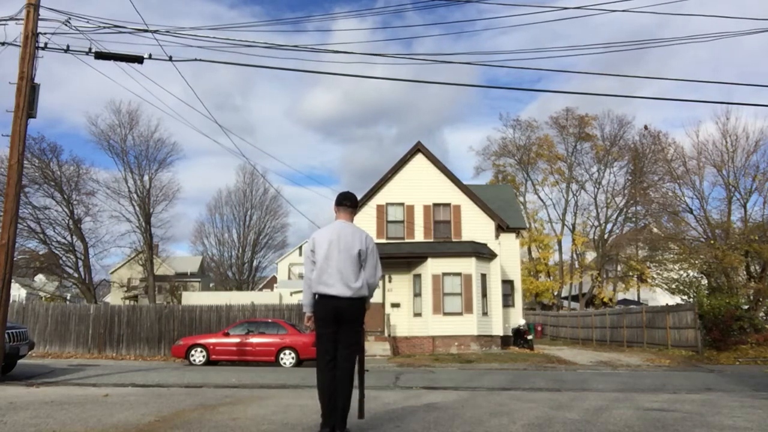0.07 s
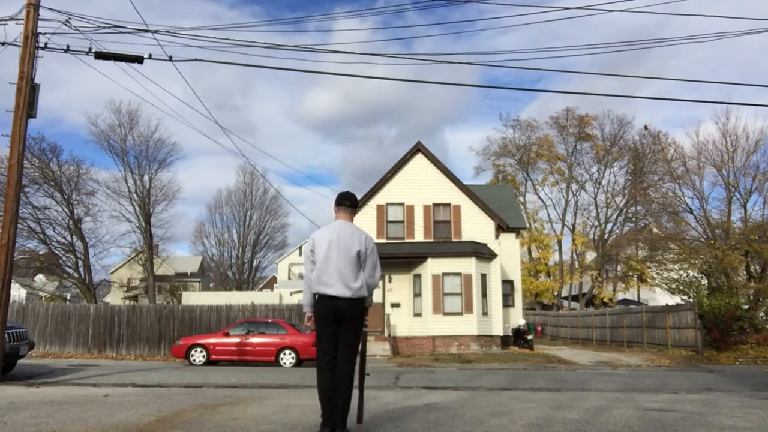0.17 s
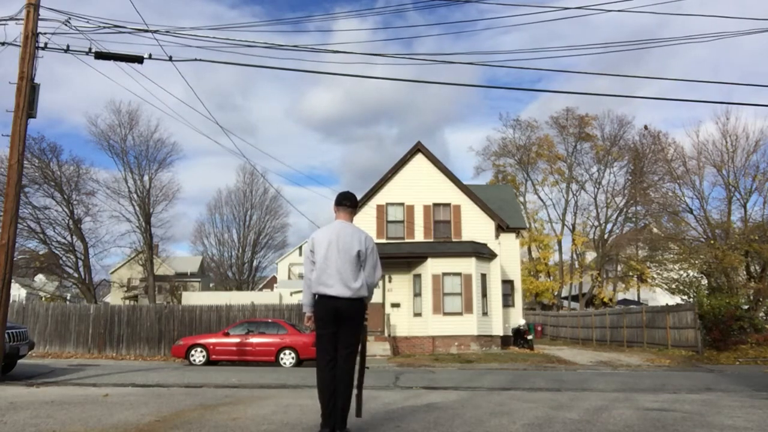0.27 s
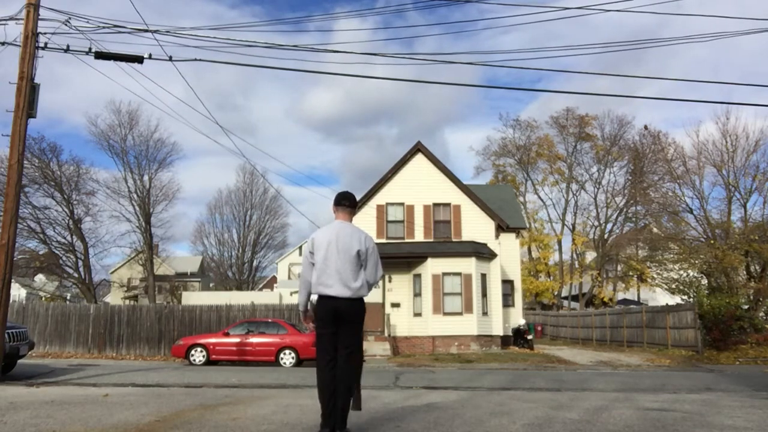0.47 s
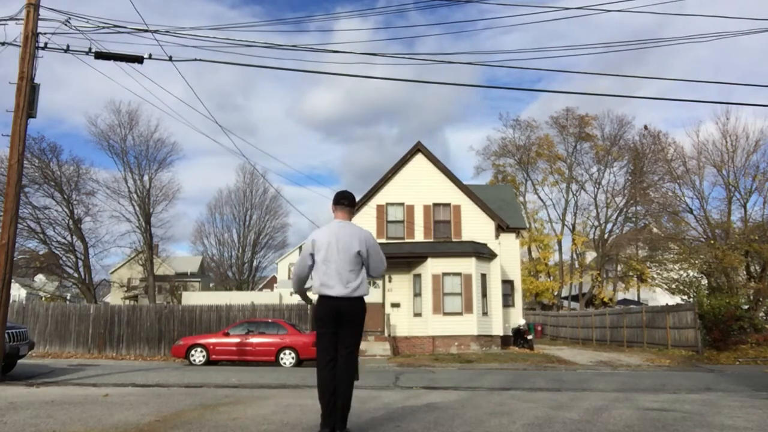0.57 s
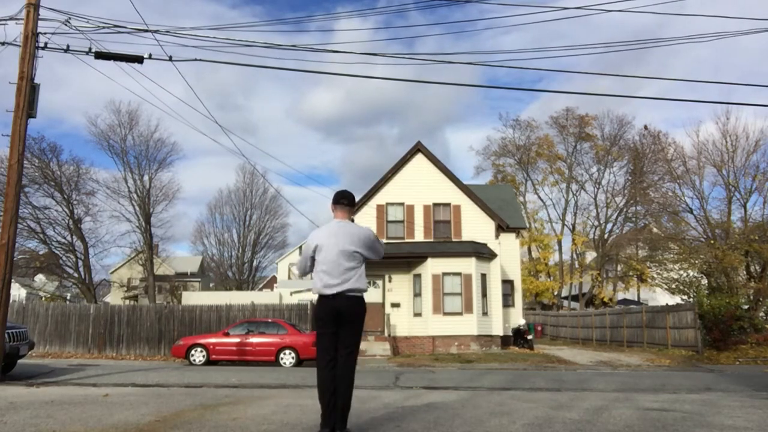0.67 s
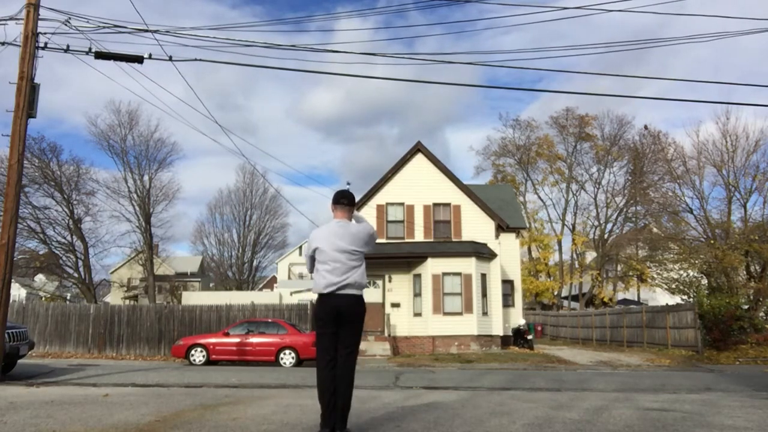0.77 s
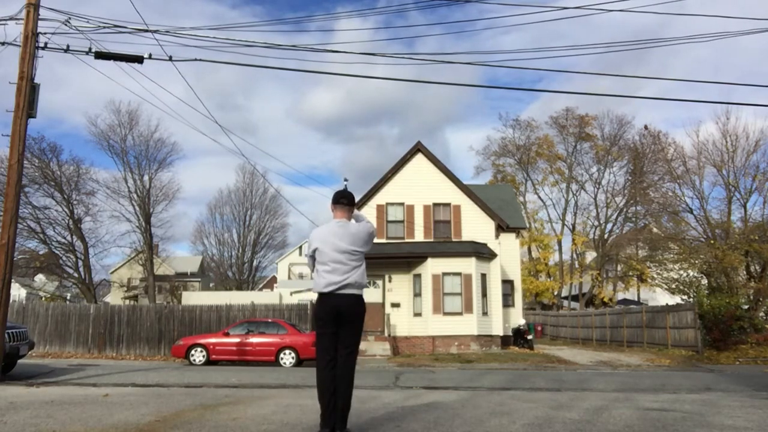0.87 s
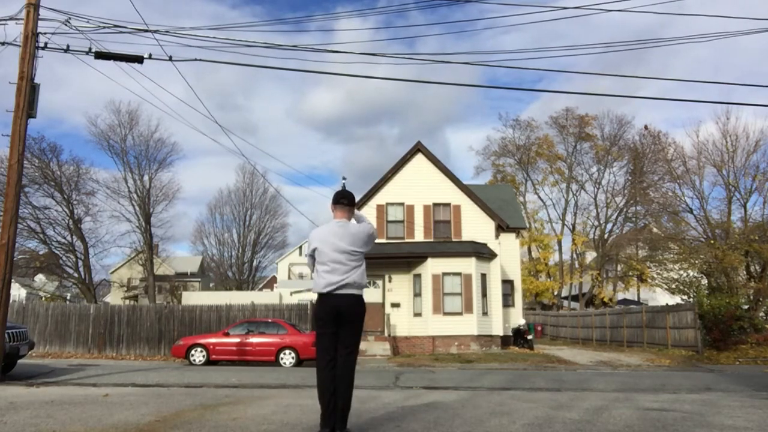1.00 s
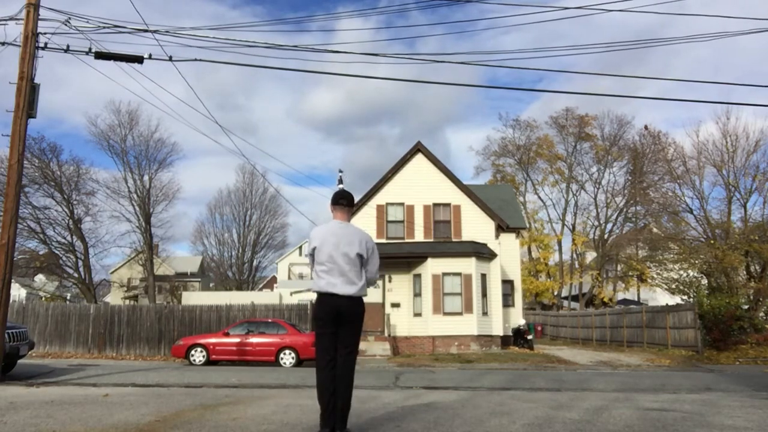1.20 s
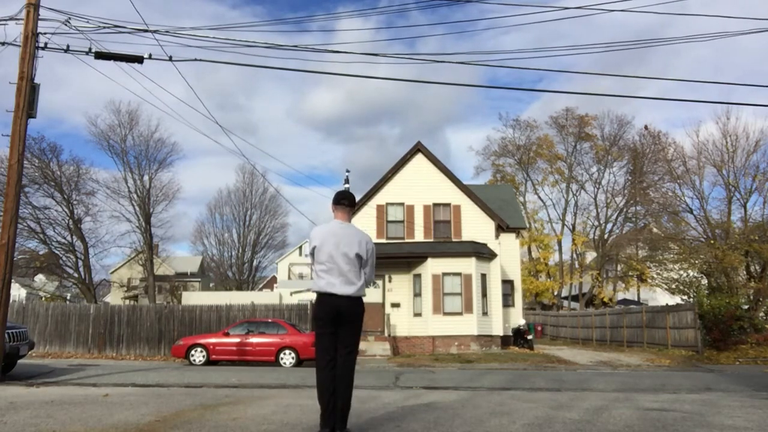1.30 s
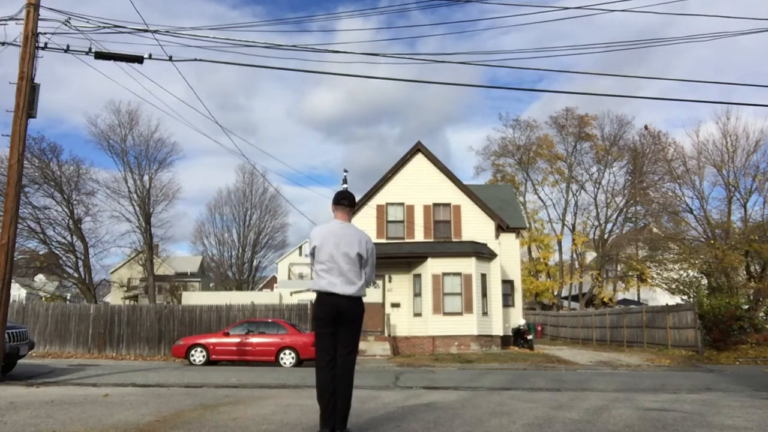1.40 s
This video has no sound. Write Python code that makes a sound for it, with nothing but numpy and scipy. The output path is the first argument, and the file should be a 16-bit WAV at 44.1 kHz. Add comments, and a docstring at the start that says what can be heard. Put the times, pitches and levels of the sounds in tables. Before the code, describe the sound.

A drill rifle cracks against asphalt, then clatters into hands twice, with wind rumbling.

```python
"""A few faint ticks from a drill rifle's sling and fittings, then its butt hits asphalt with a sharp crack.
The blow rings the wooden stock and rattles the loose steel; house fronts across the street echo it.
One steel part sings on as the rifle swings up, until a hand catches it with a smaller clatter.
A second catch seats the rifle at the shoulder.
All the while, wind buffets the microphone over a quiet outdoor background."""
import sys
import numpy as np
from scipy import signal
from scipy.fft import rfft, irfft
from scipy.io import wavfile
from scipy.ndimage import uniform_filter1d

SR = 44100
rng = np.random.default_rng(int(sys.argv[2]) if len(sys.argv) > 2 else 0)


def transcribe(signal):
    """Save signal, clipped to [-1, 1], as a 16-bit WAV file at the path in sys.argv[1]."""
    frames = np.atleast_2d(signal).T
    limited = np.clip(frames, -1, 1)
    pcm = np.round(limited * 32767).astype(np.int16)
    wavfile.write(sys.argv[1], SR, pcm)


N = 63945
T = np.arange(N) / SR


def ground_strike():
    """The flat butt plate slaps the asphalt with a low thump, and the fittings slam after it."""
    # the butt's blow, then the fittings': start_s, crack_db, stock_db, steel_db
    strikes = [(.2220, -6.5, -12.5, -18.5), (.2255, -8, -23.5, -7.5), (.2335, -19.5, -39.5, -10),
               (.2425, -20, -5, -22)]
    # tone of the crack on asphalt: pitch_hz, relative_db
    crack_tone = [(60, -10), (190, 2), (330, 4.5), (500, -10.5), (900, 0), (2500, -1), (4200, -1),
                  (6200, -5.5), (8000, -4), (11500, -9), (13500, -9), (15600, -28.5)]
    thump_hz, slap_hz, slap_s = 172.5, 901, 0.0015
    age = T - strikes[0][0]
    thump = undb(-17.5) * fade(age, decay_s=.078) * np.sin(2 * np.pi * thump_hz * age)
    slap_shape = np.exp(-((age - slap_s) / slap_s) ** 2) * (age > 0)
    slap = slap_shape * np.sin(2 * np.pi * slap_hz * age)
    clatter = blows(strikes, crack_tone, place=0,
                    crack_s=.054, rattle_db=-9.5, rattle_s=.16, jangle_db=-11.5)
    return thump + slap + clatter


def hand_catches():
    """Hands stop the rifle twice, and each time the loose fittings rattle."""
    # the first catch and its rattle: start_s, crack_db, stock_db, steel_db
    catch = [(.8785, -21.5, -18, -29), (.8828, -37, -26, -36.5), (.891, -40, -35.5, -45),
             (.8995, -25.5, -26.5, -30.5), (.912, -24.5, -41.5, -45), (.921, -35, -42, -43),
             (.9255, -43, -41, -33), (.9365, -32.5, -33, -33), (.9561, -33, -38, -30),
             (1.031, -40.5, -24, -39.5), (1.0522, -36, -43, -41.5), (1.063, -40.5, -64, -59)]
    # hands seat the rifle at the shoulder: start_s, crack_db, stock_db, steel_db
    shoulder = [(1.259, -59.5, -39.5, -74), (1.282, -75.5, -50.5, -79), (1.314, -57, -58, -52),
                (1.326, -62.5, -39.5, -51.5), (1.3355, -39.5, -31, -51), (1.3432, -27.5, -23, -24.5),
                (1.346, -47, -20, -28), (1.356, -45, -48, -61), (1.3665, -35, -26, -29),
                (1.378, -55, -61, -34.5), (1.384, -37, -58, -45)]
    # tone of a hand's smack: pitch_hz, relative_db
    hand_tone = [(120, 6.5), (300, -3), (480, -15), (660, -5), (850, -1), (1700, 4), (2800, -5), (6300, -3),
                 (7600, -12), (10500, -17.5), (12200, -24), (15600, -17)]
    touch = dict(crack_s=.026, rattle_db=-13, rattle_s=.13, jangle_db=-5.5)
    return blows(catch, hand_tone, place=1, **touch) + blows(shoulder, hand_tone, place=2, **touch)


def blows(hits, tone, place, crack_s, rattle_db, rattle_s, jangle_db):
    """Each blow gives a crack, a grainy rattle, the ring of wood and steel, and a jangle."""
    # notes of the wooden stock: pitch_hz, decay_s, strike_db, catch_db, shoulder_db
    stock_notes = [(645, .04, -13, -30, -32), (830, .045, -4, -6, -7), (975, .06, -2, -3, -10),
                   (1250, .05, -4, -7, -3), (1430, .06, -3, -3, -2), (1780, .035, -10, -6, -14),
                   (2360, .07, -13, -10, -12)]
    # notes of the steel parts: pitch_hz, decay_s, strike_db, catch_db, shoulder_db
    steel_notes = [(3065, .11, -16, -16, -4), (3530, .12, -7, -16, -18), (3930, .13, -12, -12, -18),
                   (4420, .11, -15, -16, -6), (4665, .13, -7, -11, -15), (5650, .11, -9, -11, -10),
                   (6010, .09, -10, -8, -14), (6480, .17, -7, -5, 0), (8796, .1, -10, -18, -15),
                   (10780, .16, -12, -17, -21), (11900, .12, -16, -15, -20), (14550, .1, -22, -22, -23),
                   (15660, .08, -1, -14, -9)]
    # the fittings' many weak notes, blurred into noise: pitch_hz, relative_db
    jangle_tone = [(1500, -23), (3200, -8.5), (4500, -9.5), (6500, 2.5), (7600, -7), (9000, -6),
                   (10000, -17.5), (12200, -8.5), (13500, -12.5), (15600, -7)]
    crack_power = rattle_power = jangle_power = ringing = 0
    for start_s, crack_db, stock_db, steel_db in hits:
        age = T - start_s
        crack_power += (undb(crack_db) * fade(age, crack_s)) ** 2
        rattle_power += (undb(crack_db + rattle_db) * fade(age, rattle_s)) ** 2
        jangle_power += (undb(steel_db + jangle_db) * fade(age, decay_s=.25)) ** 2
        ringing += undb(stock_db) * ring(age, stock_notes, place)
        ringing += undb(steel_db) * ring(age, steel_notes, place)
    contact = tint(np.sqrt(crack_power) * noise() + np.sqrt(rattle_power) * grit(), tone)
    jangle = tint(np.sqrt(jangle_power) * noise(), jangle_tone)
    return contact + .5 * (ringing + jangle)


def ring(age, notes, place):
    """A struck part rings, each note as four close, beating tones; place picks the level column."""
    spread_hz, scatter_db = 34, 1.0
    sound = np.zeros(N)
    live = (age > 0) & (age < .35)
    for pitch_hz, decay_s, *levels_db in notes:
        phases = rng.uniform(0, 2 * np.pi, size=(4, 1))
        pitches_hz = pitch_hz + spread_hz * rng.standard_normal(size=(4, 1))
        tones = np.sin(2 * np.pi * pitches_hz * age[live] + phases).sum(0) / 2
        gain = undb(levels_db[place] + scatter_db * rng.standard_normal())
        sound[live] += gain * fade(age[live], decay_s) * tones
    return sound


def sling():
    """The sling and fittings tick lightly as the rifle moves, and the sling's swivels clink."""
    # light ticks: start_s, level_db, length_s
    ticks = [(0.081, -57.5, .008), (0.096, -56, 0.012), (0.153, -45, 0.015), (0.163, -50, 0.021),
             (0.185, -57, .004), (0.198, -47.5, 0.048), (.484, -38.5, 0.0078), (0.505, -59, 0.0073),
             (0.67, -59, 0.016), (0.679, -51, 0.012), (0.851, -70, 0.0069)]
    # tone of the ticks: pitch_hz, relative_db
    tick_tone = [(1000, -20), (2800, -7), (4500, -7.5), (6200, 3.5), (7600, -14), (10000, -17.5),
                 (15500, -22)]
    # swivel clinks: start_s, level_db, pitch_hz
    clinks = [(0.071, -54.5, 4403), (0.085, -59.5, 4150), (0.1, -50.5, 4460), (0.127, -57.5, 4383),
              (0.125, -53, 6510), (0.162, -48, 5830), (.168, -52, 6710), (1.306, -56.5, 4410),
              (1.324, -46, 4420)]
    clink_decay_s = .08
    tick_level = clinking = 0
    for start_s, level_db, length_s in ticks:
        progress = np.maximum(T - start_s, 0) / length_s
        tick_level += undb(level_db) * progress * np.exp(2 - np.pi * progress)
    for start_s, level_db, pitch_hz in clinks:
        clinking += undb(level_db) * ring(T - start_s, [(pitch_hz, clink_decay_s, 0)], place=0)
    return tint(tick_level * grit(), tick_tone) + clinking


def singing_steel():
    """One steel part rings on after the strike, wavering as the rifle swings."""
    # its loudness as the rifle turns: time_s, level_db
    loudness = [(.222, -58), (.32, -54), (.42, -60), (.49, -56), (.55, -57), (.58, -66), (.60, -56),
                (.645, -52), (.70, -66), (.75, -66), (.785, -76), (.82, -63), (.878, -69)]
    level_db = np.interp(T, *np.array(loudness).T, left=-200, right=-200) + 1.5 * waver()
    pitch_hz = 6205 + 16 * waver()
    return undb(level_db) * np.sqrt(2) * np.sin(2 * np.pi * np.cumsum(pitch_hz) / SR)


def street_echo(sound):
    """Fences and trees scatter the sound into a fading tail; house fronts send back dull echoes."""
    # bands of the tail: pitch_hz, relative_db, decay_s
    bands = [(200, -4.5, .6), (550, -12, 1.1), (950, -10, 0.89), (1478, 0, 1.2), (1920, -5, 1),
             (3200, -13.5, 1.03), (6000, -14, .6), (9300, -5.5, 0.39), (15000, 0.5, 0.12)]
    # echoes from house fronts: delay_s, level_db
    echoes = [(.117, -27.5), (.148, -27.5), (.27, -34.5)]
    build_s, smear_s, echo_top_hz = .0067, .012, 3000
    pitches_hz, levels_db, decays_s = np.array(bands).T
    spectrum = rfft(tint(noise(), list(zip(pitches_hz, levels_db))))
    log_hz = np.log(np.maximum(np.fft.rfftfreq(N, 1 / SR), 1))
    tail = 0
    for band, decay_s in zip(np.eye(len(bands)), decays_s):
        share = np.interp(log_hz, np.log(pitches_hz), band)
        tail += irfft(spectrum * share, N) * fade(T, decay_s)
    response = undb(-20.5) * unit(tail * (1 - np.exp(-T / build_s)))
    dull = signal.butter(1, echo_top_hz, fs=SR)
    for delay_s, level_db in echoes:
        smear = noise() * (T > delay_s) * np.exp(-np.abs(T - delay_s) / smear_s)
        response += undb(level_db) * signal.lfilter(*dull, unit(smear))
    return signal.fftconvolve(sound, response / np.sqrt(N))[:N]


def wind():
    """Gusts rumble on the microphone; single swirls of air hit it as short dips in pressure."""
    # loudness of the rumble: time_s, level_db
    gusts = [(0, -60), (.045, -50.5), (.07, -32.5), (.105, -45.5), (.135, -33), (.175, -41), (.205, -40.5),
             (.31, -46), (.39, -32.5), (.43, -46.5), (.55, -39), (.645, -26.5), (.70, -52), (.735, -38),
             (.775, -25), (.83, -40.5), (.86, -43), (.94, -40), (.98, -55), (1.02, -30.5), (1.085, -47.5),
             (1.115, -34.5), (1.16, -56), (1.25, -64), (1.35, -43.5), (1.39, -53.5), (1.44, -26.5)]
    # tone of the rumble: pitch_hz, relative_db
    rumble_tone = [(20, -32.5), (42, -17.5), (70, 2), (125, 0.5), (200, -9), (300, -20.5), (450, -30.5),
                   (800, -51.5), (2000, -75)]
    # swirls of air: time_s, level_db, half_width_s
    swirls = [(0.061, -29.5, 0.0017), (0.12, -28, .0013), (0.17, -24.5, .0042), (.274, -22, 0.0013),
              (.347, -27, 0.001), (0.393, -34, 0.0012), (0.463, -24.5, 0.0036), (0.501, -22.5, 0.0027),
              (0.55, -17.5, 0.0026), (.597, -21, 0.0019), (.626, -19.5, 0.0011), (.638, -18, 0.00078),
              (0.6487, -11, 0.0015), (.759, -17, 0.0012), (0.766, -23.5, 0.0017), (0.834, -29, 0.003),
              (0.947, -31.5, 0.0037), (1.002, -23, 0.0017), (1.029, -23.5, 0.0022), (1.104, -29, 0.003),
              (1.123, -31.5, 0.0014), (1.179, -40.5, .003), (1.426, -24.5, 0.0016)]
    rumble = tint(noise(), rumble_tone)
    steady_rumble = rumble / np.sqrt(uniform_filter1d(rumble ** 2, size=1000))
    dips = 0
    for time_s, level_db, half_width_s in swirls:
        bump = 1 / np.cosh(np.clip((T - time_s) / half_width_s, -20, 20))
        dips += undb(level_db) * bump * (1 - 2 * bump ** 2)
    return steady_rumble * undb(np.interp(T, *np.array(gusts).T)) + dips


def distant_town():
    """The town far away blends into a quiet, steady hush."""
    # tone of the hush: pitch_hz, relative_db
    hush_tone = [(30, -9.5), (100, -0.5), (250, -5), (500, -12), (950, -2), (1600, -16), (3000, -22),
                 (6000, -26.5), (9000, -32.5), (15500, -44.5)]
    return undb(-57.5) * tint(noise(), hush_tone)


def undb(db):
    """Turn decibels into a number to multiply by."""
    return 10 ** (np.asarray(db) / 20)


def unit(x):
    """Scale to an average power of 1."""
    return x / np.sqrt(np.mean(x ** 2))


def noise():
    """Plain white hiss."""
    return rng.standard_normal(N)


def grit(grain_db=4.5):
    """Hiss that breaks up into millisecond grains."""
    return noise() * unit(undb(grain_db * unit(uniform_filter1d(noise(), size=50))))


def waver():
    """Slow random drift, about 1 in size."""
    return unit(uniform_filter1d(uniform_filter1d(noise(), size=700), size=700))


def fade(age, decay_s, rise_s=.00075):
    """Rise quickly at age 0, then fall by 60 dB every decay_s."""
    return np.clip(age / rise_s, 0, 1) * np.exp(-np.log(1000) * np.maximum(age, 0) / decay_s)


def tint(sound, tone):
    """Shape a sound's lows and highs along (pitch_hz, relative_db) points; white hiss keeps its power."""
    pitches_hz, levels_db = np.array(tone).T
    log_hz = np.log(np.maximum(np.fft.rfftfreq(2 * N, 1 / SR), 1))
    gains = unit(undb(np.interp(log_hz, np.log(pitches_hz), levels_db)))
    # fold the filter forward in time, so nothing sounds before its cause
    folded = irfft(np.log(gains))
    folded[1:N] *= 2
    folded[N + 1:] = 0
    return irfft(rfft(sound, 2 * N) * np.exp(rfft(folded)))[:N]


def scene():
    """The rifle, its echo, the wind and the town, in one channel."""
    rifle = ground_strike() + hand_catches() + sling() + singing_steel()
    return (rifle + street_echo(rifle) + wind() + distant_town())[None]


def record(dry):
    """Round off the loudest peaks, then cut the deepest bass and the highest treble."""
    bass_cut_hz, top_hz = 32, 15850
    rounded = np.tanh(dry)
    trimmed = signal.lfilter(*signal.butter(2, bass_cut_hz, "high", fs=SR), rounded)
    return signal.sosfilt(signal.ellip(10, .2, 80, top_hz, fs=SR, output="sos"), trimmed)


dry = scene()
out = record(dry)
transcribe(out)
```